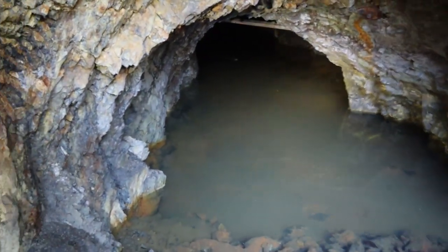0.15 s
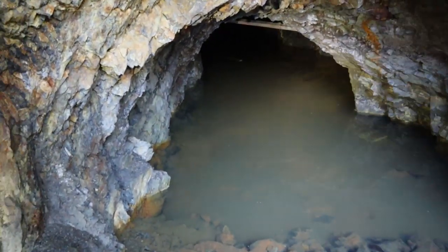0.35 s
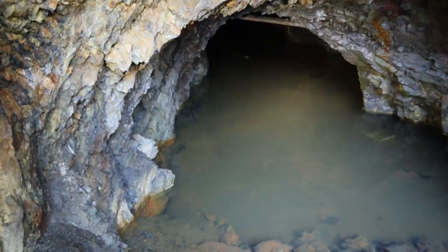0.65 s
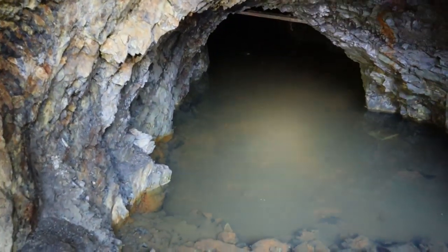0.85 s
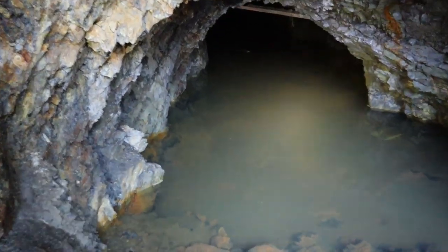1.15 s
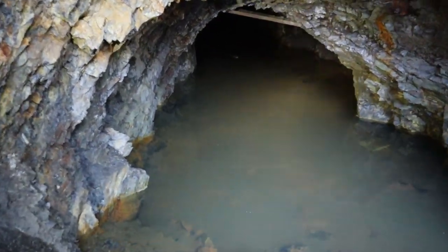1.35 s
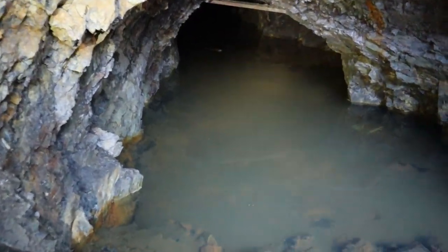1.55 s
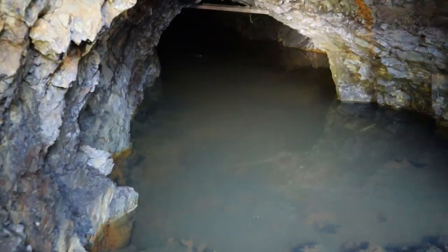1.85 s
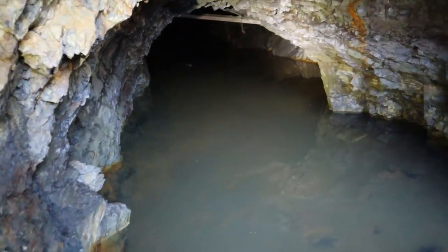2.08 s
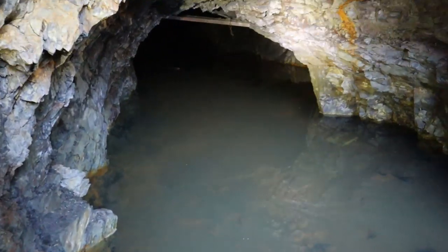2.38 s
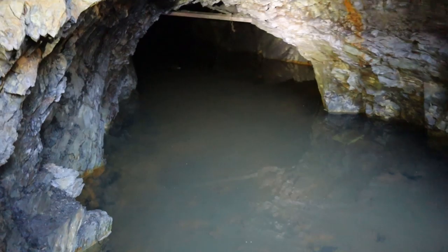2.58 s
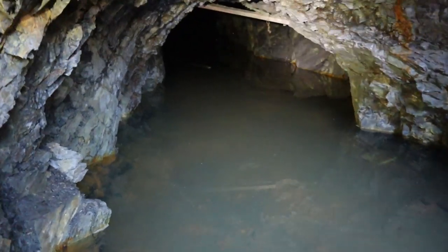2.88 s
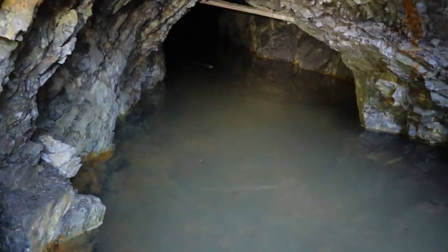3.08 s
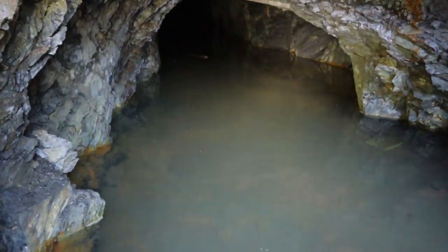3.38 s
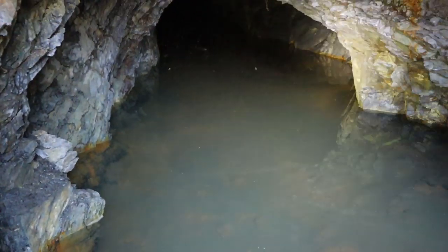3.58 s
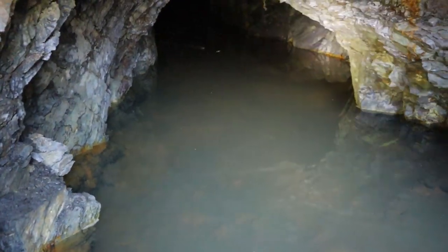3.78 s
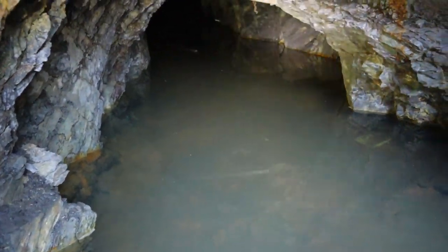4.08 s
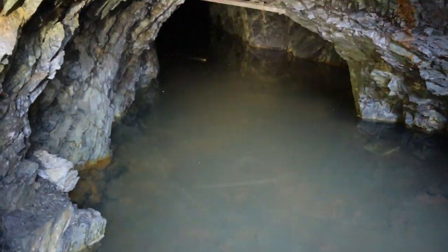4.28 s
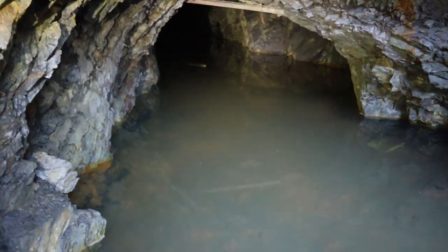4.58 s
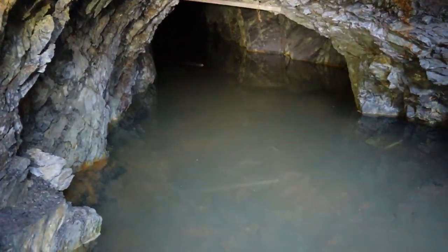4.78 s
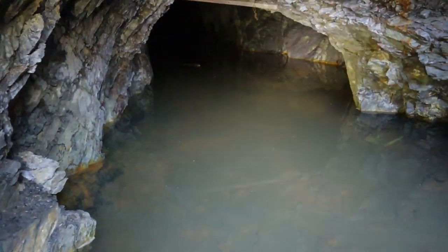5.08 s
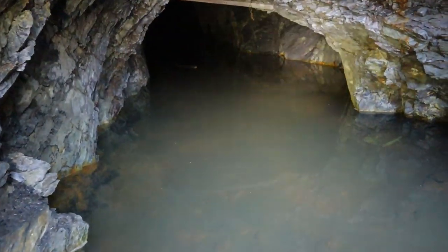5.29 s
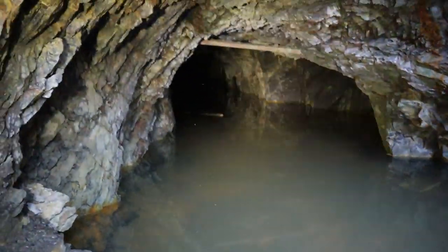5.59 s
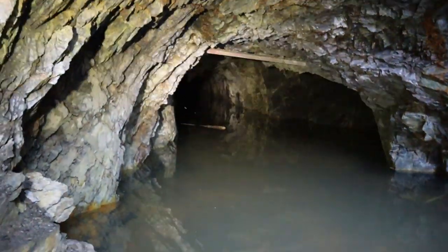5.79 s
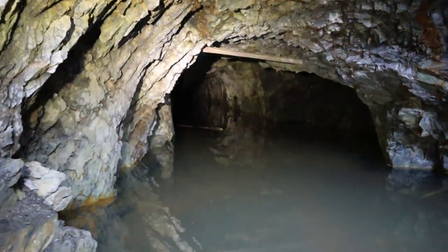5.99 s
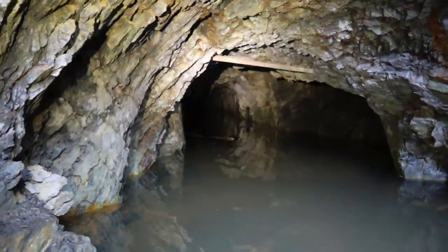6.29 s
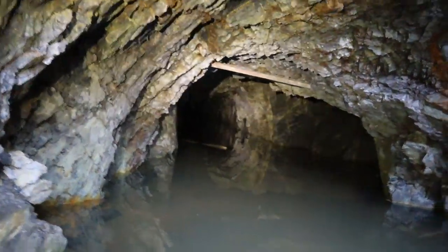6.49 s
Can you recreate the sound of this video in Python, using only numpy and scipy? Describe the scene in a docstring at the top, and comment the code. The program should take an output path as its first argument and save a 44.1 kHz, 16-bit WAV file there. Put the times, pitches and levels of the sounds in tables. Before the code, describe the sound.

Boots shift and crunch on loose rock at a tunnel mouth, stones knocking and cracking, one sharp loud clack, then thinning to quiet.

```python
"""Boots shift on loose rock at the mouth of a low flooded tunnel, close to a hand-held camera.
Gravel crunches and slides under the soles: dense short rings plus rubbing noise, swelling with each load.
Single stones knock (short tone pulses), crack (noise bursts) and scrape (a narrow band climbing in pitch).
Rock walls answer with brief decaying noise; air, hiss and rumble lie beneath.
At the end the hand bumps the camera body: damped low sines."""
import sys
import numpy as np
from scipy import signal
from scipy.fft import rfft, irfft, next_fast_len
from scipy.io import wavfile
from scipy.ndimage import map_coordinates

SR = 44100
rng = np.random.default_rng(int(sys.argv[2]) if len(sys.argv) > 2 else 0)


def waveform_to_disk(signal):
    """Save audio, clipped to [-1, 1], as 16-bit WAV at the path in sys.argv[1]."""
    frames = np.transpose(np.atleast_2d(signal))
    scaled = np.clip(frames, -1, 1) * 32767
    samples = np.round(scaled).astype(np.int16)
    wavfile.write(sys.argv[1], SR, samples)


N = 293265


def amp(db):
    """dB to gain."""
    return 10 ** (np.asarray(db) / 20)


def unit(x):
    """Scaled to rms 1."""
    return x / np.sqrt(np.mean(x ** 2) + 1e-20)


def along(points, hz):
    """(Hz, value) points interpolated on a log frequency axis."""
    point_hz, value = np.transpose(points)
    return np.interp(np.log(hz + 1), np.log(point_hz + 1), value)


def coloured(x, spectrum_db):
    """x through the causal minimum-phase filter with this spectrum, at rms 1."""
    m = 2 * next_fast_len(N // 2 + 4096)
    gain = amp(along(spectrum_db, np.fft.rfftfreq(m, 1 / SR)))
    cepstrum = irfft(np.log(gain), m)
    # folding onto positive times makes the filter causal
    cepstrum[1:m // 2] *= 2
    cepstrum[m // 2 + 1:] = 0
    response = np.exp(rfft(cepstrum))
    return unit(irfft(rfft(x, m) * response, m)[:N])


def contacts(count, spread_db, low_hz, high_hz, cycles, smooth, clump_db):
    """Random short rings of many sizes mixed with a share of rubbing noise, arriving in clumps."""
    at, pitch, size = rng.random((count, 3)).T
    hz = low_hz * (high_hz / low_hz) ** pitch
    k = np.arange(300)
    life = k * hz[:, None] / SR / cycles
    ring = np.sin(2 * np.pi * cycles * life) * life ** 0.2 * np.exp(-4 * life)
    level = amp(spread_db * size ** 3) * np.sqrt(hz) / np.linalg.norm(ring, axis=1)
    ring *= level[:, None]
    where = (at * N).astype(int)[:, None] + k
    grains = unit(np.bincount(where.ravel(), ring.ravel(), N + len(k))[:N])
    share = np.clip(smooth, 0, 1)
    clumps = map_coordinates(rng.standard_normal(N // 600 + 4), [np.arange(N) / 700])
    mix = np.sqrt(1 - share) * grains + np.sqrt(share) * rng.standard_normal(N)
    return amp(clump_db * clumps) * mix


# Decay of the rock walls. Each row: frequency in Hz, time to fall 60 dB in seconds.
WALLS_T60 = [(200, 0.18), (1200, 0.15), (4000, 0.13), (12000, 0.2)]


def echo(seconds, gap_s):
    """A fresh wall answer of energy 1 after a gap: noise decaying at its own rate in each band."""
    hz, t, bands = signal.stft(rng.standard_normal(int(seconds * SR)), SR, nperseg=128)
    decay = amp(-60 * t / along(WALLS_T60, hz)[:, None])
    tail = signal.istft(bands * decay, SR, nperseg=128)[1]
    k = np.arange(len(tail))
    tail = tail * np.clip((k / SR - gap_s) / 0.00083, 0, 1)
    lumps = map_coordinates(rng.standard_normal(50), [k / 350])
    tail = tail * amp(1.75 * lumps)  # uneven rock faces return separate clumps
    return tail / np.linalg.norm(tail)


def add(out, s, hit, echo_db):
    """Puts a hit and its own echo at time s; the nearest rocks answer first and loudest."""
    walls = echo(.22, gap_s=0.0019)
    walls = walls * (1 + amp(-5) * np.exp(-(np.arange(len(walls)) / SR / 0.0037) ** 2))
    tail = amp(echo_db) * signal.fftconvolve(hit, walls / np.linalg.norm(walls))
    tail[:len(hit)] += hit
    out[round(s * SR):][:len(tail)] += tail


# Weight shifting between the steps. Each row: time in seconds, stones level in dB.
SHUFFLE = [(0.0, -53.5), (0.2, -57), (0.4, -56), (0.6, -69), (1.3, -66), (1.43, -58.5), (3.9, -51),
           (4.22, -54), (4.7, -52), (5.17, -53.5), (5.6, -53), (6.37, -50), (6.45, -58.5), (6.65, -59.5)]
SHUFFLE_GRIT_DB, SHUFFLE_THUD_DB = -9, -13.5  # relative to the stones
# A sole loads the gravel and lets go. Each row: peak time in seconds, stones level in dB,
# swell in seconds, fade in seconds, fine grit in dB re stones, ground thud in dB re stones.
CRUNCHES = [(0.13, -36.5, 0.09, 0.12, -4, -5.5), (0.3, -46, 0.17, 0.087, -2.5, -1.5),
            (0.48, -44.5, 0.089, 0.16, -4, -3), (0.78, -45.5, 0.25, 0.16, -2.5, -9),
            (0.861, -34, 0.021, 0.078, -4.5, -3.5), (0.95, -36, 0.16, 0.53, -5, -11),
            (0.997, -31.5, 0.018, 0.32, -3.5, -11), (1.082, -26.5, 0.13, 0.11, -10, -13.5),
            (1.16, -32.5, 0.14, 0.045, -19, -8.5), (1.35, -51, 0.16, 0.13, -12, -7),
            (1.463, -33.5, 0.016, .12, -7.5, -11), (1.55, -31.5, 0.094, .2, -5, -9),
            (1.632, -22.5, 0.11, 0.059, -2, -8), (1.721, -31, 0.077, 0.21, -2, -7),
            (1.8, -39.5, 0.12, 0.086, 2.5, -18), (1.87, -47.5, 0.1, 0.15, 10, -18),
            (1.98, -50, 0.03, 0.24, 9, -7), (2.11, -40, 0.068, 0.19, -0.5, -12),
            (2.278, -35, 0.021, 0.097, -1.5, -7.5), (2.41, -41, 0.077, .13, -4.5, -13),
            (2.53, -39, 0.032, 0.52, -0.5, -7.5), (2.7, -22.5, 0.089, 0.13, -8, -20),
            (2.89, -56, 0.042, 0.2, 9.5, 6.5), (3.06, -34, 0.12, 0.074, -2.5, -13),
            (3.24, -36.5, 0.26, 0.092, -3.5, -9), (3.31, -36.5, 0.056, 0.14, 1.5, -2.5),
            (3.46, -31, 0.062, 0.07, -8, -15), (3.54, -37.5, 0.0093, .1, -0.5, -10),
            (3.578, -30, 0.05, 0.08, -2.5, -11.5), (3.74, -43.5, 0.37, 0.077, -6, -7),
            (3.89, -51.5, .03, 0.065, -4, 4), (4.021, -40, 0.039, 0.094, -1.5, -8),
            (4.08, -36.5, 0.13, 0.06, -9, -10), (4.35, -45.5, 0.051, .2, -11, -13),
            (4.46, -51, 0.13, 0.073, 3, -27), (4.87, -51.5, .03, 0.16, -4.5, -5),
            (5.33, -36, 0.14, 0.15, -6, -10), (5.48, -40, 0.11, 0.13, -6, -7),
            (5.65, -45.5, 0.18, 0.15, -10, -7), (5.72, -40, 0.041, 0.2, -11, -13.5),
            (5.9, -56, 0.22, .3, 3, -1), (6.03, -43, 0.085, .1, -11.5, -6),
            (6.066, -37, .015, 0.17, -8.5, -13)]
SWELL_DB = 20  # level change over one swell or fade time


def load():
    """Gains of stones, grit and thud: every crunch swells and fades evenly in dB over the shuffle."""
    t = np.arange(N) / SR
    layer_db = np.array([[0], [SHUFFLE_GRIT_DB], [SHUFFLE_THUD_DB]])
    power = amp(np.interp(t, *np.transpose(SHUFFLE)) + layer_db) ** 2
    for s, db, swell_s, fade_s, grit_db, thud_db in CRUNCHES:
        distance = np.maximum((s - t) / swell_s, (t - s) / fade_s)
        shape = amp(db - SWELL_DB * distance) ** 2
        power = power + amp([[0], [grit_db], [thud_db]]) ** 2 * shape
    return np.sqrt(power)


# Filter on the stone contacts. Each row: frequency in Hz, relative gain in dB.
STONES_FILTER = [(88, -31), (150, -39.5), (226, -1.5), (270, -0.5), (500, 0.5), (562, -2), (823, 0),
                 (1760, -6.5), (3570, -21.5), (5000, -47), (6500, -51), (11000, -120)]
# Filter on the grit contacts. Each row: frequency in Hz, relative gain in dB.
GRIT_FILTER = [(1200, 0), (2500, 5.5), (3500, 4.5), (5000, -3.5), (8000, -13), (12000, -23.5), (16000, -35)]
# Spectrum of the ground thud. Each row: frequency in Hz, relative density in dB per Hz.
THUD_SPECTRUM = [(20, -47), (50, -14.5), (100, -2), (200, 2), (300, 0), (500, -37)]


def gravel():
    """Ringing stones, fine grit and low ground noise all follow the pressure of the sole."""
    stone_hits = contacts(count=6000, spread_db=11, low_hz=192.6, high_hz=4740,
                          cycles=8.3, smooth=0.7, clump_db=0.5)
    stones = coloured(stone_hits, STONES_FILTER)
    grit_hits = contacts(count=12000, spread_db=5.0, low_hz=1858, high_hz=15600,
                         cycles=22, smooth=0.65, clump_db=2.5)
    grit = coloured(grit_hits, GRIT_FILTER)
    thud = coloured(rng.standard_normal(N), THUD_SPECTRUM)
    direct = np.sum(load() * [stones, grit, thud], axis=0)
    wet, step = np.zeros(N + SR), 8192
    for start in range(0, N, step):  # the sliding stones move, so the walls keep answering differently
        part = signal.fftconvolve(direct[start:start + step], echo(.25, gap_s=0.00305))
        wet[start:start + len(part)] += part
    return direct + amp(-9.0) * wet[:N]


# Still air and microphone hiss. Each row: frequency in Hz, relative density in dB per Hz.
AIR_SPECTRUM = [(20, -14), (60, -3), (250, -9), (1000, -23), (3000, -22.5), (6000, -21.5), (16000, -28)]


def air():
    """Steady coloured noise for the still air and microphone hiss."""
    return amp(-65.5) * coloured(rng.standard_normal(N), AIR_SPECTRUM)


# Low rumble on the microphone. Each row: time in seconds, level in dB.
RUMBLE = [(0.0, -64), (0.53, -68), (1.02, -66), (1.5, -57), (2.11, -76), (2.89, -63), (3.8, -65),
          (4.5, -70), (5.08, -76), (5.91, -52.5), (6.3, -61.5), (6.65, -50)]


def rumble():
    """Noise banded to 8-32 Hz, wandering in level."""
    band = signal.butter(2, [8, 32], "band", fs=SR, output="sos")
    low = unit(signal.sosfilt(band, rng.standard_normal(N)))
    return amp(np.interp(np.arange(N) / SR, *np.transpose(RUMBLE))) * low


# Stray pebbles: peak dB over stones gain, middle pitch, pitch spread, echo dB re hit.
PEBBLE_DB, PEBBLE_HZ, PEBBLE_OCTAVES, PEBBLE_ECHO_DB = 3, 756, 0.54, 4.5


def pebbles(count):
    """Rows like KNOCKS at random moments, as strong as the gravel is loaded."""
    at, pitch = rng.random(count), rng.standard_normal(count)
    db = 20 * np.log10(load()[0][(at * N).astype(int)]) + PEBBLE_DB
    hz = PEBBLE_HZ * 2 ** (PEBBLE_OCTAVES * np.clip(pitch, -2, 2))
    return list(zip(at * N / SR, db, hz, np.full(count, PEBBLE_ECHO_DB)))


# Small edges cracking. Each row: start in seconds, direct peak in dB, bright band gain in dB re dull band.
CRACKS = [(0.032, -32, -22.5), (0.102, -27, -22), (0.3228, -32, -22), (0.4163, -47, -14),
          (0.4708, -29.5, -14), (0.655, -41, -6), (0.861, -31, -18), (1.0799, -26, -16),
          (1.315, -33.5, -15), (1.3548, -25.5, -8.5), (1.409, -34, -20), (1.4335, -51, -16),
          (1.4625, -37, -18), (1.729, -19, -3), (1.7604, -13.5, -20), (1.8016, -15, -13),
          (1.8723, -16.5, -13), (1.953, -34, -3), (1.9849, -18, -27), (2.107, -22.5, -32),
          (2.1398, -23, -28), (2.277, -48, -12), (2.672, -15, -27), (2.7371, -14, -33), (2.823, -24, -28),
          (2.918, -32, -20), (3.175, -30, -8), (3.227, -35, -16), (3.279, -24, -10), (3.3123, -14.5, -17),
          (3.446, -28.5, -15), (3.5384, -34, 0), (3.8236, -29.5, -22), (3.839, -39, 8), (4.342, -47, -6),
          (4.4123, -36.5, -10), (4.442, -30.5, -20), (5.1317, -36, -13), (5.197, -37, -19),
          (5.326, -25, -21), (5.42, -29.5, -12), (5.468, -38, -12), (5.708, -29, -17), (5.8212, -34.5, -20),
          (6.06, -43, -10), (6.095, -32, -10), (6.4723, -39.5, -21)]
CRACK_ECHO_DB, SNAP = 1.5, 4  # echo re hit; first edge over the burst's spread


def cracks():
    """Sharp edges snap: an impulse and fast-dying noise in a dull and a bright band."""
    out, t = np.zeros(N + SR), np.arange(800) / SR
    dull = signal.butter(3, [1900, 4600], "band", fs=SR)
    bright = signal.butter(2, [4500, 10000], "band", fs=SR)
    for s, db, bright_db in CRACKS:
        burst = rng.standard_normal(len(t)) * amp(-60 * t / 0.0035)
        burst[0] += SNAP  # the first contact is one sharp edge
        crack = signal.lfilter(*dull, burst) + amp(bright_db) * signal.lfilter(*bright, burst)
        add(out, s, amp(db) * crack / np.abs(crack).max(), CRACK_ECHO_DB)
    return out[:N]


# Stones knocking. Each row: start in seconds, direct peak in dB, pitch in Hz, echo in dB re hit.
KNOCKS = [(0.086, -30.5, 1040, 12.5), (0.101, -27.5, 423, 10), (0.22, -35, 576, 6.5),
          (0.28, -25, 830, -0.5), (0.414, -31, 2480, 2.5), (0.472, -34.5, 780, 7), (0.596, -38.5, 883, 1),
          (0.668, -40.5, 610, 5), (0.713, -37.5, 770, 9), (0.802, -23, 990, -2), (0.851, -30, 810, 11),
          (0.993, -19, 595, 8.5), (1.079, -16.5, 560, 6), (1.142, -20, 487, 3), (1.352, -18, 2000, -4.5),
          (1.461, -42, 800, -3), (1.496, -31, 890, 5), (1.518, -27, 820, 7), (1.544, -20, 800, 7),
          (1.58, -12.5, 880, 4), (1.702, -22.5, 895, 11.5), (1.761, -9.5, 1040, 3), (1.8, -16, 860, -3.5),
          (1.868, -32, 746, -7), (1.898, -23.5, 1340, 6.5), (1.953, -30, 837, 1.5), (1.984, -40, 2200, -11),
          (2.085, -16, 1150, 5.5), (2.129, -25, 1000, 5), (2.23, -32, 1240, 1), (2.27, -14.5, 1100, 7.5),
          (2.331, -24, 1100, -7), (2.362, -29, 1230, 6), (2.407, -31, 544, -11), (2.512, 0.5, 1326, 0),
          (2.618, -22.5, 470, -13), (2.642, -22, 472, -8), (2.675, -20, 935, 10), (2.735, -19, 690, 4.5),
          (2.911, -32.5, 980, 5.5), (2.983, -33, 1010, 10), (3.017, -23, 1770, -14),
          (3.045, -19.5, 1250, 7), (3.073, -22, 635, -16), (3.14, -29, 550, 3), (3.175, -23.5, 794, 1),
          (3.277, -25, 740, 8), (3.312, -15, 625, -1.5), (3.342, -15.5, 524, 2.5), (3.415, -24.5, 834, 4.5),
          (3.445, -18.5, 1090, 5.5), (3.486, -25.5, 570, 2), (3.537, -31, 603, 11), (3.556, -11, 1000, 4),
          (3.623, -18, 910, 6.5), (3.726, -34.5, 800, 4), (3.88, -28.5, 590, 0.5), (4.079, -24, 870, 5),
          (4.414, -36.5, 594, -7), (4.455, -37, 2360, 1), (4.527, -30.5, 1180, 0.5),
          (4.628, -33.5, 1110, 5), (4.686, -30.5, 1060, 0), (4.725, -39, 770, -2), (4.764, -22, 1100, -2),
          (4.853, -36.5, 935, 12), (4.998, -38.5, 764, 3), (5.124, -43, 781, 4), (5.226, -26.5, 1050, 4),
          (5.254, -28, 760, 1.5), (5.377, -25, 1050, 3.5), (5.418, -26, 745, 1), (5.707, -28, 960, 4),
          (5.759, -40, 1550, -3), (6.058, -26.5, 1050, 3), (6.06, -34.5, 428, 10), (6.32, -40, 745, 7)]


def knocks():
    """Blows of two or three cycles with a higher mode; each reaches the walls from another spot."""
    out, t = np.zeros(N + SR), np.arange(800) / SR
    for s, db, hz, echo_db in KNOCKS + pebbles(count=50):
        late = t - .001 - 1.242 / hz  # time from the middle of the blow
        blow = np.exp(-(late * hz / 0.7) ** 2) * np.sin(2 * np.pi * hz * late)
        higher = np.exp(-(late * hz / 0.61) ** 2) * np.sin(2 * np.pi * 1.96 * hz * late)
        blow += amp(-14.5) * higher
        add(out, s, amp(db) * blow / np.abs(blow).max(), echo_db)
    return out[:N]


# A stone dragging on rock. Each row: time in seconds, pitch in Hz, level in dB.
SCRAPE = [(5.74, 1567, -77), (5.761, 1605, -43), (5.8, 1650, -45), (5.85, 1820, -55), (5.899, 2070, -50),
          (5.96, 2110, -56), (6.03, 2180, -71)]


def scrape():
    """A narrow band of rubbing noise that climbs in pitch: slow noise on a gliding carrier."""
    s, hz, db = np.transpose(SCRAPE)
    t = np.arange(N) / SR
    slow = signal.lfilter(*signal.butter(2, 200, fs=SR), rng.standard_normal((2, N)))
    phase = 2 * np.pi * np.cumsum(np.interp(t, s, hz)) / SR
    band = unit(slow[0] * np.cos(phase) + slow[1] * np.sin(phase))
    return amp(np.interp(t, s, db, left=-200, right=-200)) * band


# Hand on the camera body. Each row: start in seconds, push in dB before damping, pitch in Hz.
BUMPS = [(6.479, -31, 95), (6.51, -41, 40), (6.566, -32.5, 91), (6.589, -40, 60), (6.639, -43, 70)]


def bumps():
    """The camera shell is pushed and swings once or twice: heavily damped sines."""
    out, t = np.zeros(N + SR), np.arange(SR // 10) / SR
    for s, db, hz in BUMPS:
        swing = np.sin(2 * np.pi * hz * t) * np.exp(-1.8 * hz * t)
        out[round(s * SR):][:len(t)] += amp(db) * swing
    return out[:N]


def scene():
    """Gravel, stones and bumps over still air, microphone hiss and rumble."""
    return (gravel() + air() + rumble() + cracks() + knocks() + scrape() + bumps())[None]


TOP_HZ = 15830  # band limit


def record(dry):
    """The input rounds off the loudest peak; nothing is kept above the band limit."""
    soft = dry / (1 + np.abs(dry / .97) ** 8) ** (1 / 8)
    m = next_fast_len(N + 4096)
    keep = np.fft.rfftfreq(m, 1 / SR) < TOP_HZ
    return irfft(rfft(soft, m) * keep, m)[:, :N]


dry = scene()
out = record(dry)
waveform_to_disk(out)
```